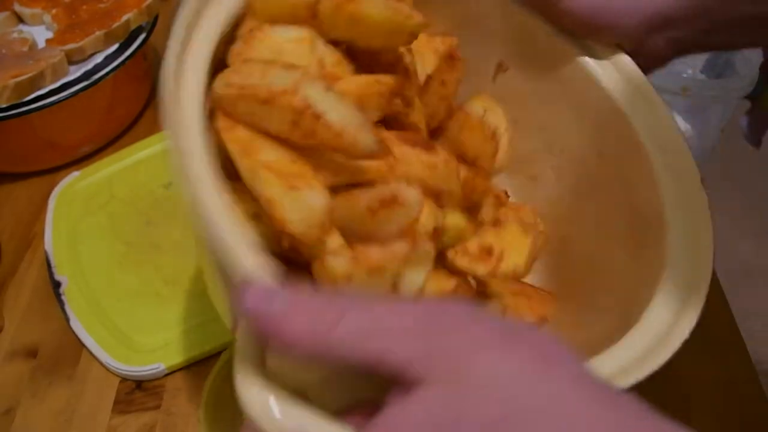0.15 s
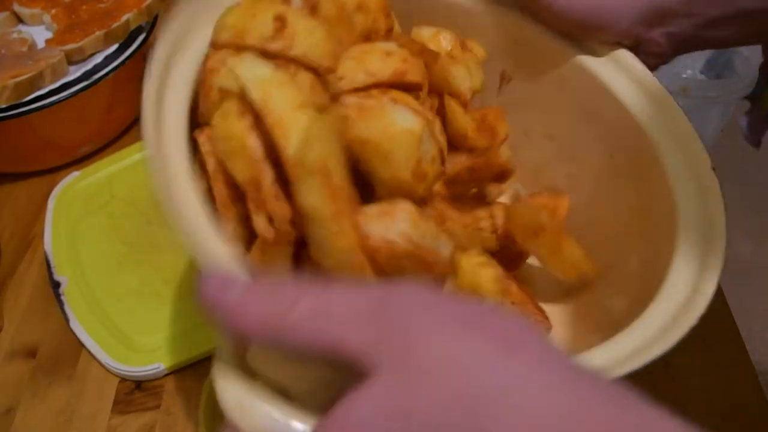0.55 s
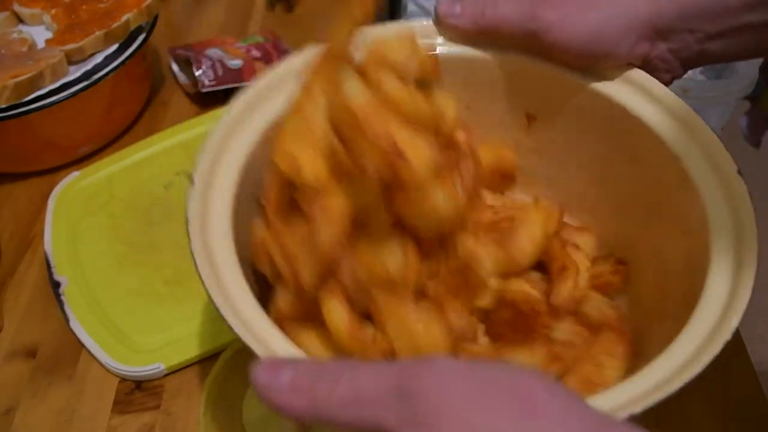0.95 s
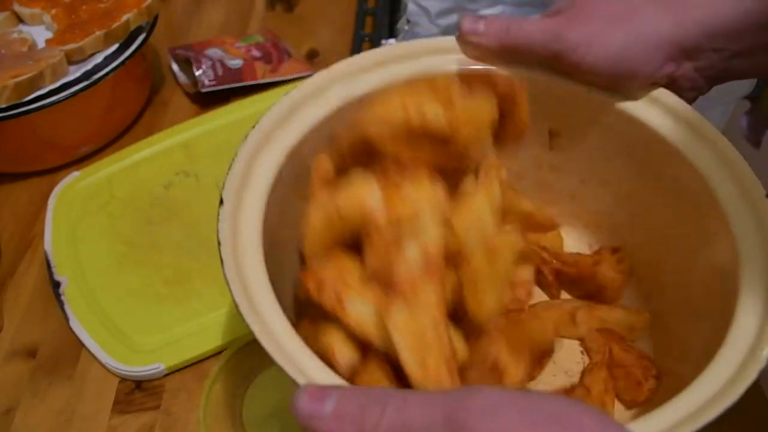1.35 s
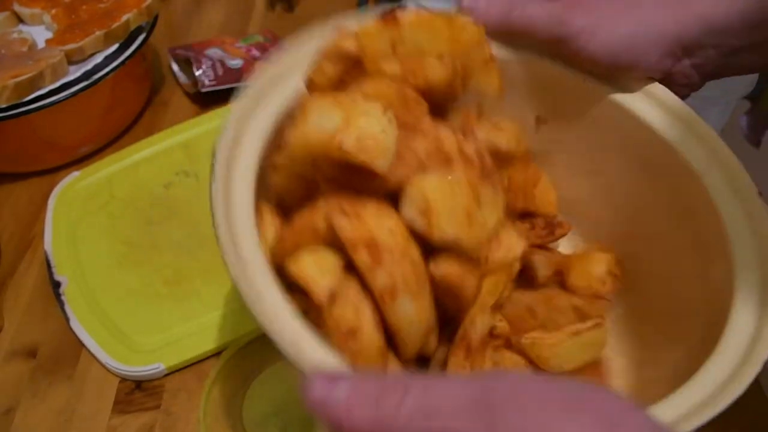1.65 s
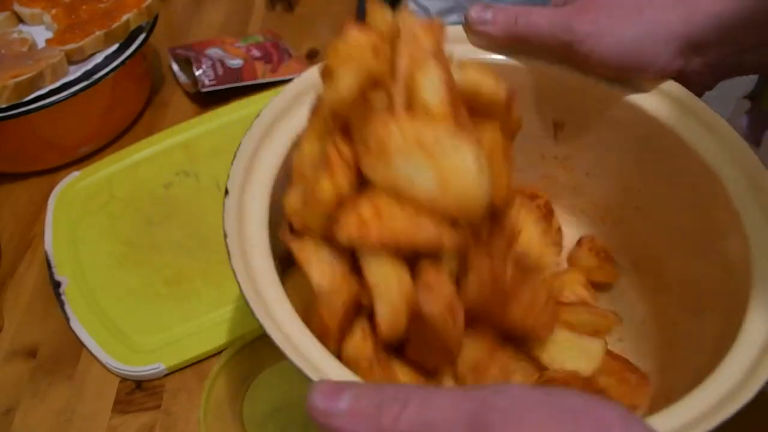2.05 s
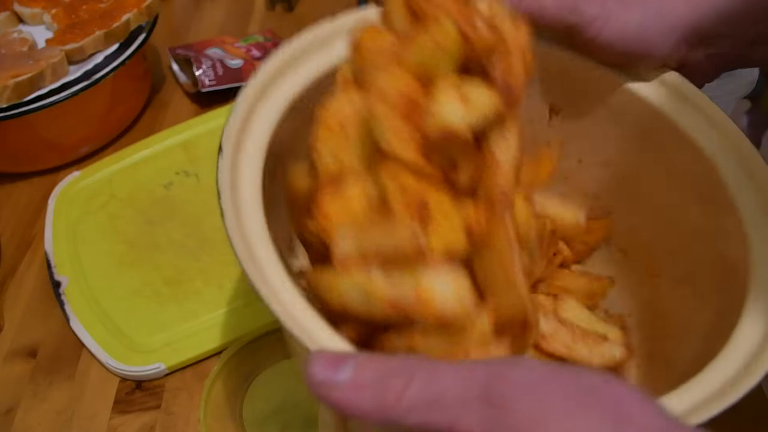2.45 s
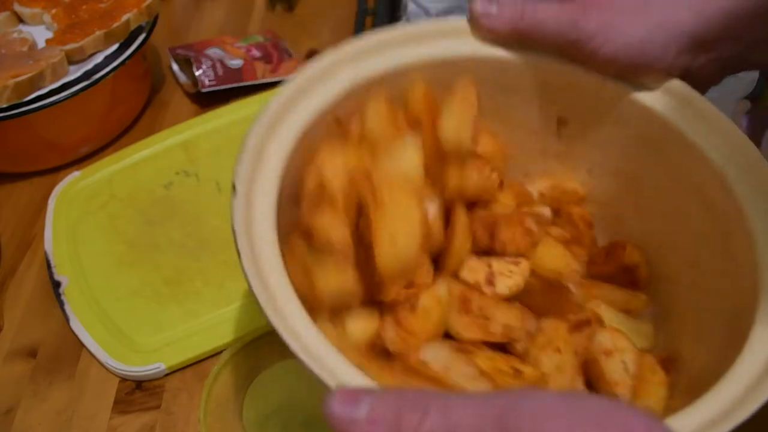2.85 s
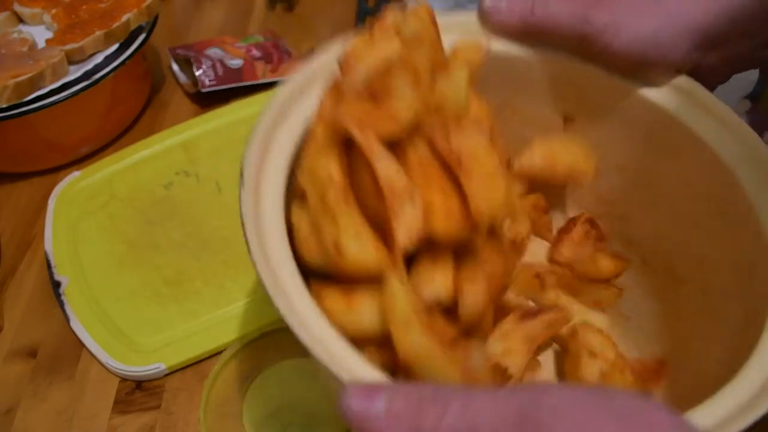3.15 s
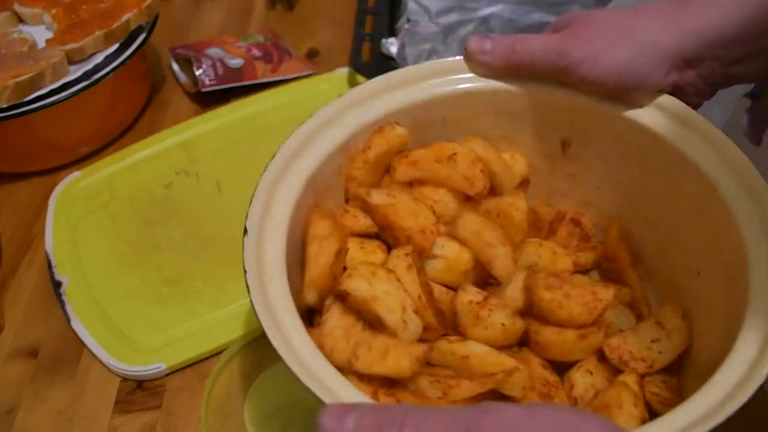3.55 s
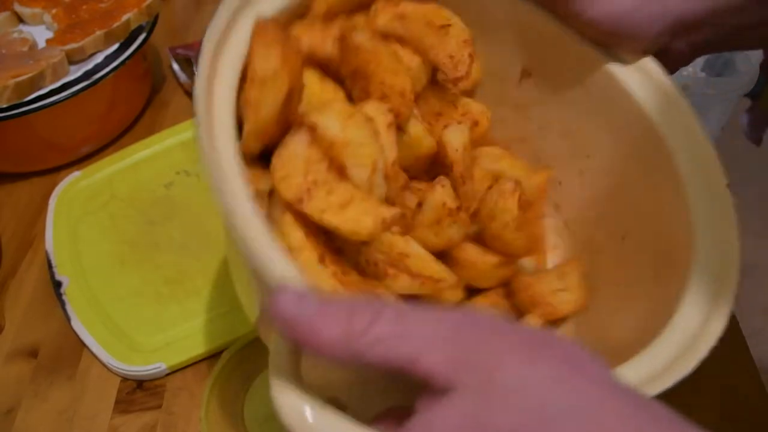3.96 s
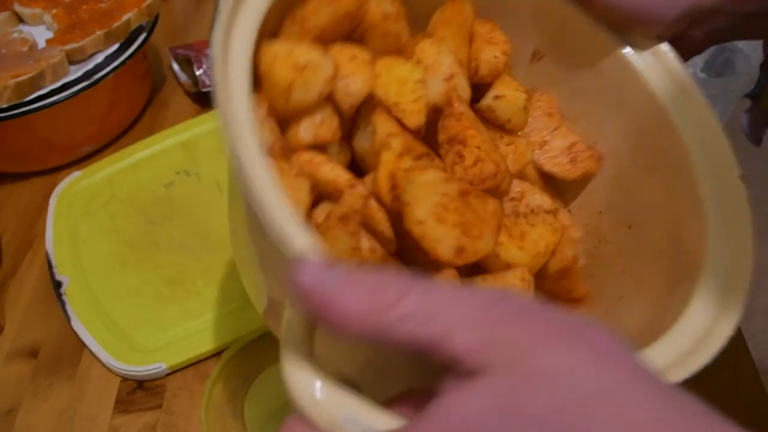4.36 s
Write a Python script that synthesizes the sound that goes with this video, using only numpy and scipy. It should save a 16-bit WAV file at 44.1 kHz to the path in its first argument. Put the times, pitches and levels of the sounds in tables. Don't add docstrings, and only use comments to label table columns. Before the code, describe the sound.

Very close, wide stereo sound of raw, oiled potato wedges tossed in an enamelled bowl in a quiet kitchen. The pattern is regular: a wet, grainy slither and light touches, then a rush of soft blows that ring the bowl around a hollow mid pitch, with dull low thumps, a short airy boom and thin pings from the wall. Each burst dies within a fraction of a second. Landings peak around 0.2, 0.6 (heavy), 0.95, 1.33, 1.7, 2.07, 2.5, 2.85, 3.17 and 3.47 seconds. A sharp wet tick and pop stand out at 1.42. From about 3.6 to 3.9 it is nearly quiet, with only faint bowl rumble and tiny pops. Tumbling resumes at 3.95 to 4.1, and a strong landing at 4.37 to 4.45 ends the take abruptly. The ring is short and damped; echo is faint, over low room murmur.

```python
import sys
import numpy as np
from scipy import signal
from scipy.fft import rfft, irfft, next_fast_len
from scipy.io import wavfile
from scipy.ndimage import uniform_filter1d, minimum_filter1d

SR = 44100
rng = np.random.default_rng(int(sys.argv[2]) if len(sys.argv) > 2 else 0)


def level_to_linear(level):
    exponent = np.asarray(level, float) / 20
    return 10 ** exponent


def generate_wav(sig):
    pcm = np.round(np.clip(np.atleast_2d(sig).T, -1, 1) * 32767).astype(np.int16)
    wavfile.write(sys.argv[1], SR, pcm)


N = 198711

# (f/Hz, width/Hz, level/dB)
LOW_MODES = [(567, 18.7, -11), (619, 39, -9.5), (655.5, 29.7, -9.5), (751, 23.5, -11.5), (776.4, 34, -7.5),
             (771, 39, -5.5), (1110, 9.5, -29), (993, 9.4, -16.5), (1060, 27.7, -5), (1105.5, 26.7, -4),
             (1121.7, 17.3, -7.5)]
# (f/Hz, width/Hz, level/dB)
WALL_MODES = [(1619.4, 20, -3.5), (1661.5, 31.3, 5.5), (2190, 17.3, -2), (2414, 48.6, 6), (3045, 63, 4.5),
              (3416, 25.4, -0.5)]
# (f/Hz, width/Hz, level/dB)
HIGH_MODES = [(4103, 26, -2.5), (4510, 50, 4), (5430, 57, 4), (5820, 21, -3.5), (6100, 63, 1),
              (7110, 37, -0.5), (7450, 17, -2.5), (7710, 78, 3.5), (8740, 86, 1.5), (9360, 91, 3.5),
              (10340, 110, 4.5)]
# (f/Hz, level/dB per Hz)
WET_HISS = [(1940, -10), (3300, -1.5), (3500, 0.5), (3850, -7), (4470, -3.5), (4930, -4), (5410, 1),
            (6630, -3), (7410, -2.5), (8290, -1.5), (10300, -2.5), (14900, -15), (15900, -25)]
# (f/Hz, likeness from 0 to 1)
LIKENESS = [(30, .72), (60, .965), (125, .99), (300, .993), (700, 0.98), (1400, 0.72), (3000, 0.05),
            (15000, 0)]
WANDER = 0.013


def evened(x):
    return x / np.sqrt(np.mean(x ** 2) + 1e-20)


def read(points, hz):
    f, value = np.transpose(points)
    return np.interp(np.log(hz + 1), np.log(f + 1), value)


def half_turn(hz):
    return np.arccos(np.clip(read(LIKENESS, hz), -1, 1)) / 2


def paired(a, b, shape):
    size = next_fast_len(N)
    hz = np.fft.rfftfreq(size, 1 / SR)
    turn = half_turn(hz)
    middle = rfft(a, size) * np.cos(turn)
    side = rfft(b, size) * np.sin(turn)
    both = np.array([middle + side, middle - side]) * level_to_linear(read(shape, hz))
    return evened(irfft(both, size)[:, :N])


def knocks(per_s, spread_db):
    size_db = spread_db * np.minimum(rng.exponential(1, N), 4)
    size = level_to_linear(size_db) * rng.choice([-1., 1.], N)
    return evened(size * (rng.random(N) < per_s / SR))


def scattered(drive, uneven):
    return lambda hz: drive * (1 + uneven * rng.standard_normal(N))


def bent(hz, wander):
    turns_per_s = 14
    t = np.arange(N) / SR
    drift = np.interp(t * turns_per_s, np.arange(200), rng.standard_normal(200))
    return np.exp(2j * np.pi * hz * wander * np.cumsum(drift) / SR)


def ring(drive, modes, wander=0):
    swing_in_hz = 540
    out = np.zeros((2, N))
    for hz, width, db in modes:
        pole = np.exp((2j * hz - abs(width)) * np.pi / SR)
        swing_in = np.exp((2j * hz - swing_in_hz) * np.pi / SR)
        bend = bent(hz, wander) if wander else 1
        decay = np.convolve([1, -pole], [1, -swing_in])
        mode = bend * signal.lfilter([1 - abs(swing_in)], decay, drive(hz) / bend)
        turn = half_turn(hz) * rng.choice([-1, 1])
        out += level_to_linear(db) * (mode * np.exp(1j * turn * np.array([[1], [-1]]))).imag
    lowest_hz = 0.81 * min(modes)[0]
    rumble_cut = signal.butter(N=4, Wn=lowest_hz, btype="high", fs=SR, output="sos")
    return signal.sosfilt(rumble_cut, out)


def patchy(x, depth_db):
    top_db = 7
    z = signal.stft(x, nperseg=512)[2]
    fine, wide = rng.standard_normal((2,) + z.shape[1:])
    fine = evened(uniform_filter1d(uniform_filter1d(fine, size=2, axis=0), size=4, axis=1))
    wide = evened(uniform_filter1d(uniform_filter1d(wide, size=14, axis=0), size=3, axis=1))
    patch_db = np.minimum(depth_db * (1.4 * fine + 2.1 * wide), top_db)
    return evened(signal.istft(z * level_to_linear(patch_db), nperseg=512)[1][:, :N])


def motion(rows, rest_db):
    break_db_per_s = 2500
    t = np.arange(0, N / SR, .001)
    s, db, swell, lead, fall = np.transpose(rows)[..., None]
    lead = abs(lead)
    swelling = swell * np.clip(s - t, 0, lead)
    breaking = break_db_per_s * np.maximum(s - lead - t, 0)
    falling = abs(fall) * np.maximum(t - s, 0)
    level = np.maximum((db - swelling - breaking - falling).max(0), rest_db)
    return np.interp(np.arange(N) / SR, t, level)


def heap(base_db=0, share=1, rest_db=-66):
    # (peak t/s, level/dB, swell/(dB/s), first contact to peak/s, fall/(dB/s))
    tosses = [(0, -31.5, 300, .01, 144), (.22, -11.5, 253, 0.16, 197), (.401, -26, 53, 0.007, 157),
              (.6, -9.5, 305, 0.069, 142), (.95, -14.5, 287, 0.12, 163), (1.33, -15, 313, 0.13, 129),
              (1.71, -18, 179, 0.16, 193), (2.02, -24, 104, 0.0364, 155), (2.09, -14, 53, 0.0473, 169),
              (2.44, -24.5, 135, 0.114, 150), (2.5, -12, 44, 0.04, 184), (2.75, -30, 50, 0.021, 79),
              (2.87, -18, 53, 0.074, 231), (3.1, -38, 46, 0.065, 100), (3.17, -18, 308, 0.039, 90),
              (3.465, -18, 300, 0.011, 192), (3.45, -30, 104, 0.046, 92), (3.94, -42.5, 77, 0.13, 100),
              (3.98, -20.5, 102, 0.011, 101), (4.05, -12, 106, 0.044, 238), (4.2, -33, -71, .1, 101),
              (4.38, -17, 299, 0.0051, 98), (4.365, -29, 50, 0.0053, 100), (4.45, -9.5, 143, 0.09, 393)]
    return level_to_linear(base_db + share * motion(tosses, rest_db))


def room_tone():
    # (f/Hz, level/dB per Hz)
    tone_colour = [(35, -72), (60, -21), (192, -28.5), (248, -8), (351, -14.5), (509, -31), (627, -9),
                   (869, -25.5), (1450, -27), (1670, -24), (15500, -39)]
    return level_to_linear(-51) * paired(*rng.standard_normal((2, N)), tone_colour)


def patter():
    return level_to_linear(-41.0) * ring(scattered(knocks(900, 3.26) * heap(), 2.11), LOW_MODES, WANDER)


def thud():
    # (f/Hz, level/dB per Hz)
    bump_colour = [(29, -59), (50, -23), (124, 1), (311, -1), (345, 1), (445, -3.5), (480, -2),
                   (620, -23.5), (1060, -120)]
    # (f/Hz, width/Hz, level/dB)
    air_modes = [(252, 26, -6.5), (313, 46, 1)]
    boom = evened(ring(scattered(knocks(200, 2.5), 0.46), air_modes, WANDER))
    bumps = paired(knocks(400, 3.1), knocks(350, 16.0), bump_colour)
    follow = heap(base_db=-24.5, share=0.73, rest_db=-47.5)
    return follow * (bumps + level_to_linear(-5.0) * boom)


def scrape():
    # (f/Hz, level/dB per Hz)
    rasp_colour = [(900, -48), (1400, -20), (2300, 17.5), (2750, -4), (3700, 6.5), (4200, -3)]
    rung = evened(ring(scattered(knocks(350, 3.7), 2.1), WALL_MODES))
    rasp = patchy(paired(knocks(2500, 3.5), knocks(2500, 3.5), rasp_colour), 5.5)
    return heap(base_db=-10, share=0.94) * (level_to_linear(-5.0) * rung + level_to_linear(-12.0) * rasp)


def slide():
    # (end t/s, level/dB, swell/(dB/s), slip length/s, fall/(dB/s))
    slips = [(0, -36, 200, 0.0057, 196), (.11, -40, 141, 0.041, 100), (.26, -29, 21, 0.14, 129),
             (.397, -30.5, -300, 0.0025, 702), (.41, -40.5, -50, .015, 66), (.6, -28, 110, 0.083, 300),
             (.68, -28, -86, 0.069, 95), (.99, -27.5, 36, 0.14, 152), (1.28, -29, 30, .045, 110),
             (1.44, -28.5, 25, 0.21, 140), (1.72, -27.5, 61, 0.15, 128), (1.95, -44, 20, 0.01, 40),
             (2.005, -27.5, 200, 0.024, 298), (2.1, -23.5, 121, 0.055, 132), (2.38, -33.5, 112, 0.031, 149),
             (2.49, -24.5, 120, 0.047, 113), (2.67, -40, 98, .05, 168), (2.87, -27, 84, 0.15, 168),
             (3.31, -31.5, 13, 0.241, 273), (3.44, -37.5, 42, 0.072, 104), (3.47, -23.5, 300, 0.0026, 172),
             (3.84, -55, 62, 0.03, 151), (3.9, -54, 41, 0.044, 105), (3.98, -35.5, 145, 0.055, 198),
             (4.06, -30, -16, 0.095, 92), (4.22, -38.5, -37, .12, 245), (4.45, -24.5, 203, 0.13, 143)]
    slow_noise = uniform_filter1d(rng.standard_normal(N), round(0.011 * SR))
    clumps = level_to_linear(0.43 * evened(slow_noise))
    rung = evened(ring(scattered(knocks(450, 4.44), 3.2), HIGH_MODES))
    hiss = patchy(paired(knocks(6000, 2.1), knocks(5000, 1.9), WET_HISS), 1.1)
    return level_to_linear(motion(slips, rest_db=-75)) * clumps * (level_to_linear(-5) * rung + level_to_linear(-3.0) * hiss)


def pops():
    # (t/s, peak level/dB)
    pop_times = [(0.079, -31), (0.3444, -36), (0.394, -24.5), (0.4324, -34), (0.478, -38), (0.612, -17),
                 (1.4247, -11), (1.564, -30.5), (2.108, -15.5), (2.637, -27), (3.028, -32), (3.6626, -53),
                 (3.695, -44), (3.8013, -59), (3.807, -45), (3.9025, -45), (4.2406, -51), (4.4513, -21)]
    s, peak_db = np.transpose(pop_times)
    starts = np.zeros(N)
    starts[np.round(s * SR).astype(int)] = level_to_linear(peak_db)
    fade_s = 0.0055
    burst = signal.lfilter([1], [1, -np.exp(-1 / (fade_s * SR))], starts)
    treble = [(5500, -35), (9000, -1), (11500, -1), (16000, -20.5)]  # (f/Hz, level/dB per Hz)
    return level_to_linear(-7.5) * burst * paired(*rng.standard_normal((2, N)), treble)


def ticks():
    # (t/s, peak level/dB, brightest f/Hz, fade/s)
    tick_times = [(0.1166, -49, 6100, 0.017), (0.265, -19.5, 5430, 0.0099), (0.3931, -20.5, 3630, 0.018),
                  (0.612, -14.5, 6100, 0.006), (0.9447, -18, 3430, 0.0021), (1.235, -38, 7800, 0.0057),
                  (1.3653, -22, 7100, 0.024), (1.4218, -7.5, 7700, 0.001), (1.484, -18.5, 3570, 0.0042),
                  (1.6868, -14.5, 3270, 0.003), (1.7704, -17.5, 3110, 0.0031), (1.994, -26, 5820, 0.013),
                  (2.05, -14, 3320, 0.0019), (2.0827, -15, 5900, 0.0051), (2.258, -26, 6960, 0.032),
                  (2.45, -19, 5300, 0.0049), (2.8165, -19, 3300, 0.0026), (2.861, -14, 4400, 0.014),
                  (3.03, -27.5, 8000, 0.034), (3.1638, -16.5, 3520, 0.034), (3.302, -17, 3040, 0.0041),
                  (3.4673, -9.5, 3000, 0.0029), (3.933, -22.5, 8500, 0.03), (3.972, -18.5, 3700, 0.013),
                  (4.029, -17, 3200, 0.05), (4.36, -41, 3200, 0.0033), (4.4283, -10.5, 6750, 0.0053),
                  (4.4528, -11, 8500, 0.042), (0.197, -23, 3050, .005), (0.538, -24, 5260, 0.011),
                  (0.589, -20.5, 5470, 0.0072), (0.856, -24, 5400, 0.0098), (0.9604, -18, 3420, .005),
                  (1.9664, -30, 8100, .008), (1.9834, -26, 6940, 0.0073), (2.2458, -31, 7050, 0.0065),
                  (2.3565, -36, 8760, .008), (2.37, -28, 5450, 0.011), (2.481, -16, 5820, 0.0041),
                  (2.6695, -28, 5530, 0.0056), (2.797, -23, 3400, .005), (2.868, -18, 3030, .005),
                  (3.0726, -35, 5430, 0.012), (4.24, -30, 4100, 0.0063)]
    s, peak_db, bright_hz, fade_s = np.transpose(tick_times)
    at = np.round(s * SR).astype(int)
    t = np.arange(3000) / SR
    burst = np.zeros(N + 3000)
    for k, db, fade in zip(at, peak_db, fade_s):
        shape = np.exp(-t / max(fade, .001)) + 0.13 * np.exp(-t / 0.00097)
        burst[k:k + len(t)] += level_to_linear(db) * shape

    def drive(hz):
        octaves_off = abs(np.log2(bright_hz / hz))
        x = np.zeros(N)
        x[at] = level_to_linear(peak_db - 55 * octaves_off + 1.5 * rng.standard_normal(len(s)))
        return x
    crack = burst[:N] * paired(*rng.standard_normal((2, N)), WET_HISS)
    return level_to_linear(-12.5) * crack + level_to_linear(-8.0) * ring(drive, WALL_MODES[4:] + HIGH_MODES)


def thumps():
    # (t/s, peak level/dB, f/Hz)
    floor_knocks = [(0.128, -44, 280), (0.195, -30, 470), (0.224, -26, 312), (0.36, -31, 308),
                    (0.536, -31, 330), (0.586, -28.5, 210), (0.629, -22, 386), (0.867, -30, 295),
                    (0.872, -27, 470), (0.904, -25, 402), (0.924, -28, 394), (1.32, -27.5, 479),
                    (1.359, -22.5, 223), (1.645, -33.5, 258), (1.68, -21, 403), (2.045, -31, 426),
                    (2.07, -22, 277), (2.26, -38, 315), (2.492, -18, 370), (2.526, -21.5, 270),
                    (2.564, -28, 266), (2.73, -32, 390), (2.758, -35, 372), (2.852, -18, 370),
                    (3.185, -26, 423), (3.495, -32, 361), (3.954, -27, 317), (4.029, -18, 370),
                    (4.374, -32, 260), (4.442, -17, 425)]
    peak_cycles, sag_cycles = 1.63, 0.22
    out = np.zeros(N + SR)
    for s, db, hz in floor_knocks:
        turns = np.arange(round(12 * SR / hz)) * hz / SR
        knock = turns * np.exp(1 - turns / peak_cycles) / peak_cycles / (turns + 0.38)
        knock *= np.sin(2 * np.pi * (turns + sag_cycles * (1 - np.exp(-turns))))
        out[round((s + .004) * SR):][:len(knock)] += level_to_linear(db) * knock
    return level_to_linear(1.5) * out[:N]


def blows():
    # (t/s, peak level/dB, low modes level/dB, wall modes level/dB against it)
    wedges = [(.179, -12, -5.5, -5), (.197, -4, -20, 1), (0.394, -12.5, -12, -12), (0.543, -14.5, -7, -1),
              (0.668, -14, -14, -9), (.767, -17.5, -7.5, -27), (.88, -24, -4.5, -7), (.989, -6, -7, -5),
              (1.045, -20.5, 2, -11), (1.325, -16, -36, -30), (1.352, -12, -30, -17),
              (1.486, -15, -6.5, -16), (1.685, -7, -15, -13.5), (1.768, -26, -7, -4.5),
              (1.996, -22, -22, 7), (2.096, -16, 7, -35), (2.424, -14, -40, -32), (2.542, -27, 8, -18),
              (2.798, -19.5, 0.5, 1), (2.818, -10.5, -2, -28), (2.84, -3.5, -4, -21), (2.868, -7, -22, -22),
              (3.192, -15, -15, -2), (3.293, -13.5, -10, -11), (3.465, -1.5, -4.5, -12),
              (3.473, -14, -7, -6), (3.966, -7, -5.5, -55), (4.008, -12, -1, -21), (4.039, -17, -2, -33),
              (4.359, -23, 1, -9), (.262, -18.5, 2, -13), (0.276, -15, -11, -15), (.684, -14, 0, -10),
              (.722, -25, -0.5, -8), (.737, -9, -16, -27), (.929, -22, 2.5, -28), (1.001, -15, 2.5, -19),
              (1.319, -11, -2, -3), (1.395, -22.5, -26, -20), (1.405, -24, 1.5, -18), (2.527, -27, 8, 3),
              (2.57, -28.5, 9, -22), (2.91, -14, -38, -30), (3.159, -19.5, -1, -25), (3.187, -15, -1, -24),
              (3.236, -20, -4, -9), (3.247, -23, -3, -25), (4.046, -15, -15, -9), (4.1, -26, -26, -1),
              (4.489, -18, -4, -21)]
    # (t/s, peak level/dB, main ring f/Hz, floor modes level/dB, rim mode level/dB against it)
    landings = [(.246, 0.5, 980, -17, -43), (.588, 0, 1160, -11, 1.5), (0.598, 4.5, 1230, -13, -13),
                (.61, 4.5, 1070, -37, -42), (.636, 9.5, 1087, -48, -13), (.704, 0.5, 1080, -17, -39),
                (.937, -5, 1060, -7, -22), (.967, -1.5, 1120, -13.5, -48), (1.312, 2.5, 1114, -26, -8.5),
                (1.366, 0, 1150, -10, -24), (2.05, 6, 1130, -24.5, -20), (2.071, -7, 1150, -5.5, -26),
                (2.0825, 7, 1120, -5.5, -18), (2.4504, -5, 1130, -1.5, -3), (2.483, 9, 1240, -21, -31),
                (2.498, 3, 1060, -17, -12.5), (2.859, -10, 1160, 1, 0.5), (3.165, 4.5, 1188, -16, -20.5),
                (3.456, -7.5, 1154, -33, -7), (3.502, -2, 1060, -40, -10.5),
                (4.374, -1.5, 1146, -38, -20.5), (4.395, 5, 1110, -27, -11.5),
                (4.428, 9.5, 1144, -18.5, -14.5), (4.4466, -4, 1120, -2, 2), (.224, -8.5, 1105, -27, -7),
                (.621, -2.5, 1060, -2, -16), (0.652, -13, 1110, -23, -14), (.947, 0, 1130, -31, -9),
                (.953, -3, 1150, -32, -17), (1.331, -6, 1130, -9, -26), (2.077, 0, 1100, -26, -20),
                (2.092, -15.5, 1120, 10.5, 2.5), (2.115, -17, 1080, 2, 0), (2.515, -16, 1140, 4.5, -12),
                (2.895, -11, 1100, -20, -25), (4.411, 5.5, 1170, -23, -25), (4.455, -9, 1050, -5, -19),
                (4.483, -1, 1115, -18, -20)]
    # (t/s, peak level/dB)
    touches = [
        (0.146, -43),
        (.528, -23.5),
        (1.265, -22),
        (1.647, -17),
        (1.984, -21),
        (2.733, -25),
        (3.138, -21),
        (3.442, -20),
        (3.956, -19),
    ]
    group_edges = (700, 900, 1400)
    wedge_hz, touch_low_db, touch_wall_db = 1108, -6.5, -12.5
    rows = [row + (-19 - 0.6 * row[1],) for row in landings]
    rows += [(s, db, wedge_hz, low, low, wall) for s, db, low, wall in wedges]
    rows += [(s, db, wedge_hz, touch_low_db, touch_low_db, touch_wall_db) for s, db in touches]
    s, peak_db, main_hz, floor_db, rim_db, wall_db = np.transpose(rows)
    late_s = rng.random((len(s), 3)) * [0, .006, .014]
    at = np.round((s[:, None] + late_s) * SR).astype(int)

    def drive(hz):
        groups = (floor_db + 9.5, rim_db + 3.0, -.08 * abs(main_hz - hz), wall_db + 2.0)
        mode_db = peak_db + groups[np.searchsorted(group_edges, hz)]
        contact_db = mode_db[:, None] + [0, -11, -14]
        x = np.zeros(N)
        x[at] = level_to_linear(contact_db + 2.5 * rng.standard_normal(at.shape))
        return x
    soft = signal.windows.hann(round(0.00065 * SR) + 2)
    blow_modes = [(hz, 0.93 * width, db) for hz, width, db in LOW_MODES] + WALL_MODES
    rung = ring(drive, blow_modes, WANDER)
    return level_to_linear(-8.5) * signal.oaconvolve(rung, soft[None] / soft.sum())[:, :N]


def pings():
    # (t/s, peak level/dB, ringing f/Hz)
    edge_hits = [(.166, -18, 3400), (.197, -30, 1650), (.198, -44, 2470), (.237, -10, 1650),
                 (.249, -17, 1620), (.3945, -22, 2330), (.584, -19, 1670), (.597, -32, 1650),
                 (.636, -7, 2200), (.869, -26, 3450), (.944, -13, 2400), (.961, -8, 2520),
                 (.992, -25, 1650), (1.311, -21, 2420), (1.327, -34, 1650), (1.366, -13, 1560),
                 (1.486, -16.5, 1600), (1.684, -10.5, 2150), (2.05, -19, 2150), (2.09, -13, 2420),
                 (2.481, -8.5, 2430), (2.498, -5.5, 1700), (2.522, -21, 1650), (2.797, -25, 2310),
                 (2.818, -24, 1650), (2.818, -21, 2420), (2.835, -22, 2420), (2.86, -22, 1670),
                 (3.141, -23, 3420), (3.163, -10, 1650), (3.171, -28, 2420), (3.457, -22, 1650),
                 (3.457, -11, 2300), (3.467, -11, 1700), (3.503, -14, 1650), (2.06, -10, 2190),
                 (4.398, -15, 2190), (4.008, -24, 2300), (4.046, -10, 2380), (4.096, -15, 2270),
                 (4.154, -21, 3045), (.527, -32, 2420), (.527, -41, 1650), (4.374, -12, 2150),
                 (4.376, -40, 1650), (4.428, -5, 1650), (4.432, -34, 2440), (4.453, -18, 1650)]
    s, peak_db, near_hz = np.transpose(edge_hits)

    def drive(hz):
        x = np.zeros(N)
        x[np.round(s * SR).astype(int)] = level_to_linear(peak_db - 60 * abs(np.log2(near_hz / hz)))
        return x
    return level_to_linear(-11.5) * ring(drive, WALL_MODES)


def drags():
    # (start t/s, length/s, level/dB, strongest f/Hz)
    edge_drags = [
        (0.575, 0.1, -24, 1574),
        (0.871, 0.024, -31, 3500),
        (1.984, 0.076, -36, 2310),
        (2.358, 0.1, -37, 5080),
        (2.727, 0.041, -44, 3400),
        (3.14, 0.015, -38.5, 3440),
        (4.374, 0.18, -42.5, 4630),
    ]
    s, length, db, near_hz = np.transpose(edge_drags)[..., None]
    along = (np.arange(N) / SR - s) / length
    fade = level_to_linear(db - 19 * np.clip(along, 0, 9) ** 3)
    chatter = knocks(977, 4.1) * fade * (along >= 0)

    def drive(hz):
        nearness = level_to_linear(-42 * abs(np.log2(near_hz[:, 0] / hz)))
        return nearness @ chatter * rng.choice([-1., 1.], N)
    return level_to_linear(-20.0) * ring(drive, WALL_MODES + HIGH_MODES[:4])


def kitchen(x):
    # (f/Hz, t/s)
    echo_times = [(200, 0.097), (1000, 0.5), (4000, 0.25), (12000, 0.053)]
    taps = rng.choice([-1., 1.], (2, SR // 2)) * (rng.random((2, SR // 2)) < .05)
    taps[:, :300] = 0
    hz, t, z = signal.stft(taps, SR, nperseg=256)
    fade = level_to_linear(-60 * t / read(echo_times, hz)[:, None])
    tail = signal.istft(z * fade, SR, nperseg=256)[1]
    a, b = signal.fftconvolve(x.mean(0)[None], tail / np.linalg.norm(tail[0]), axes=1)[:, :N]
    return paired(a, b, [(20, 0), (20000, 0.0071)]) * np.std(a)


def scene():
    tone = room_tone()
    bowl = patter() + thud() + scrape() + slide() + pops()
    bowl = bowl + ticks() + thumps() + blows() + pings() + drags()
    return bowl + level_to_linear(-18) * kitchen(bowl) + tone


def low_pass(x):
    return signal.sosfilt(signal.butter(12, 16090, fs=SR, output="sos"), x)


def record(dry):
    # (f/Hz, left minus right level/dB)
    balance = [(400, -.3), (1000, -1.8), (2000, -6), (4000, .5), (8000, -6.5), (14000, -8)]
    bass_hz, top_hz = 54.6, 16090
    size = next_fast_len(N)
    hz = np.fft.rfftfreq(size, 1 / SR)
    sides = level_to_linear(read(balance, hz) * np.array([[.5], [-.5]]))
    bass_loss = hz ** 2 / (hz ** 2 + bass_hz ** 2)
    x = irfft(rfft(dry, size) * sides * bass_loss * (hz < top_hz), size)[:, :N]
    peaks = -minimum_filter1d(-abs(x).max(0), size=150)
    crest = uniform_filter1d(peaks, size=100)
    mix = np.clip(x / np.maximum(crest / 1.25, 1), -1, 1)
    return low_pass(mix)


dry = scene()
out = record(dry)
generate_wav(out)
```